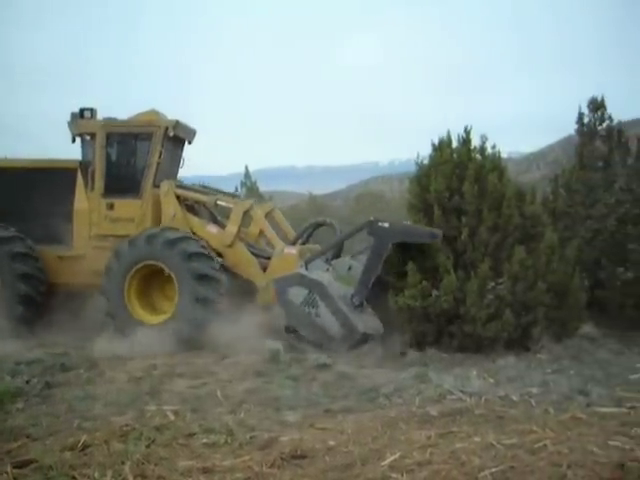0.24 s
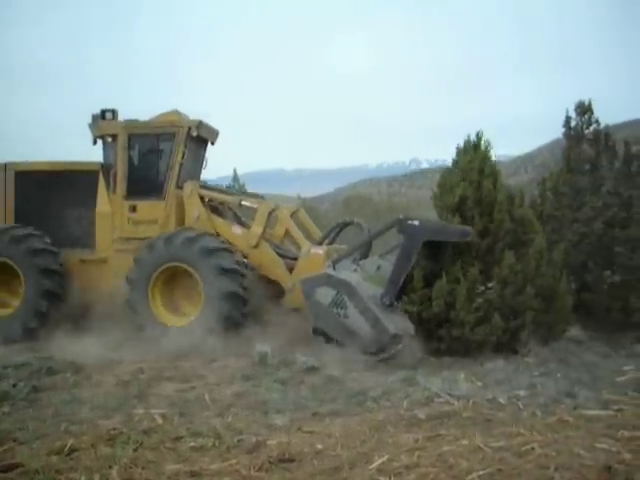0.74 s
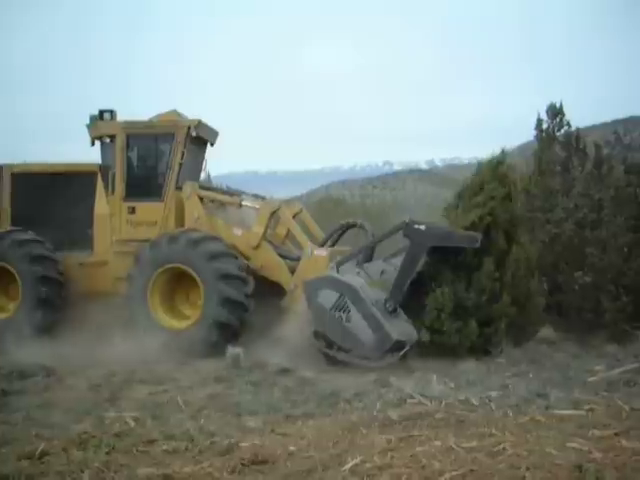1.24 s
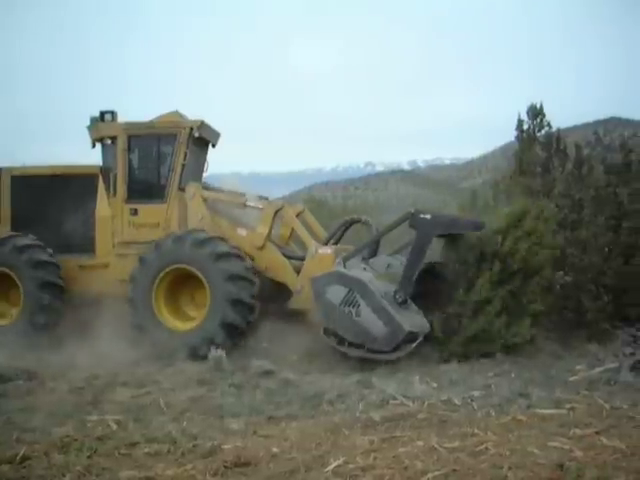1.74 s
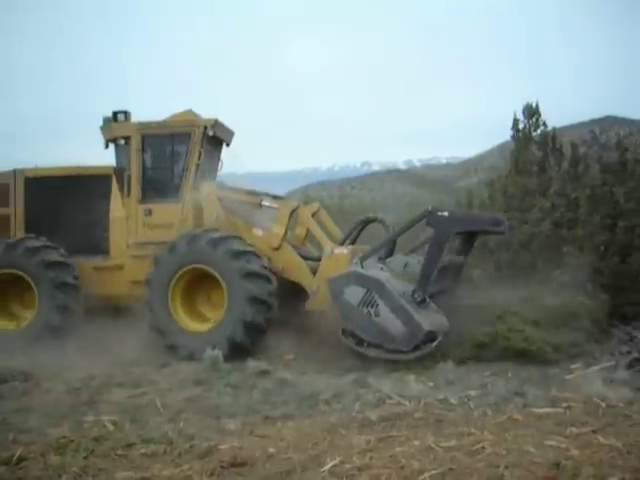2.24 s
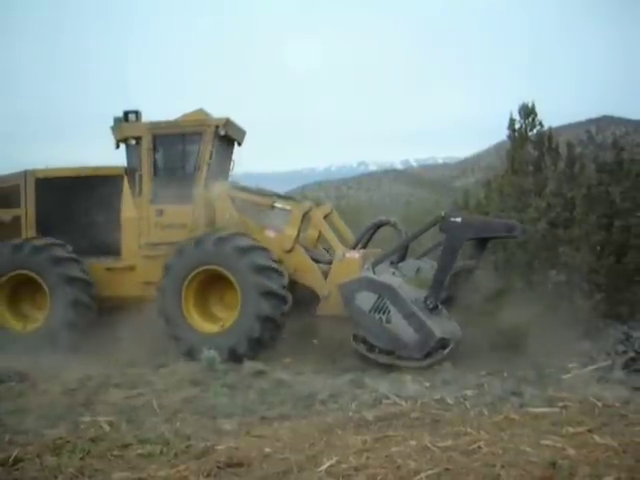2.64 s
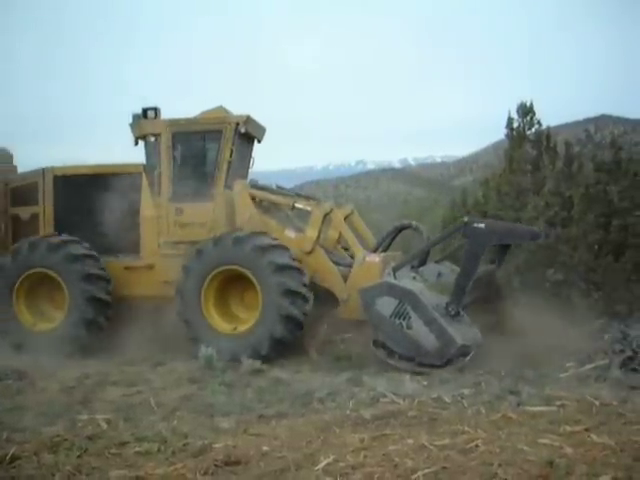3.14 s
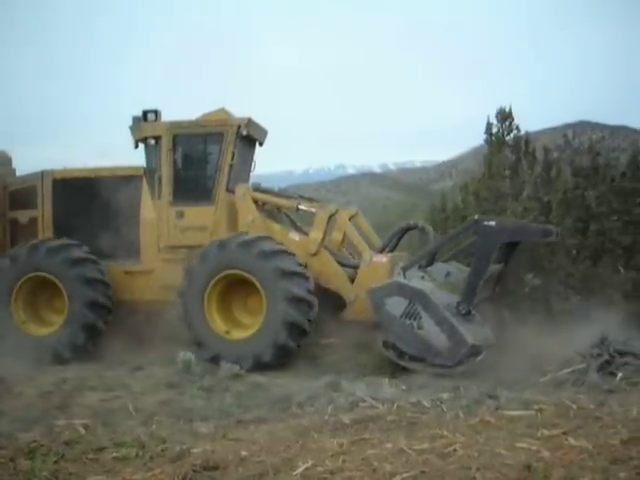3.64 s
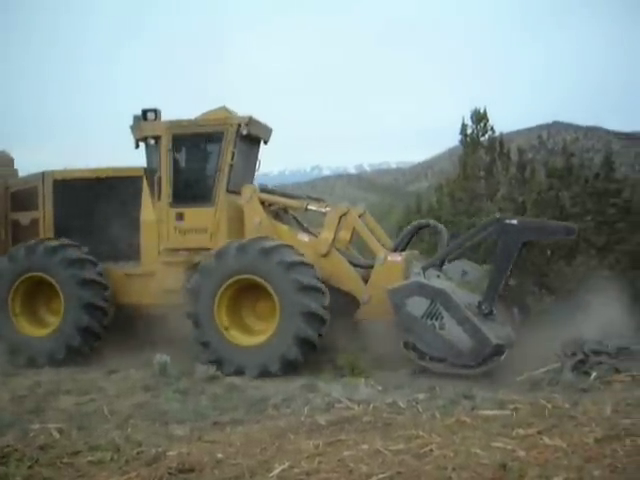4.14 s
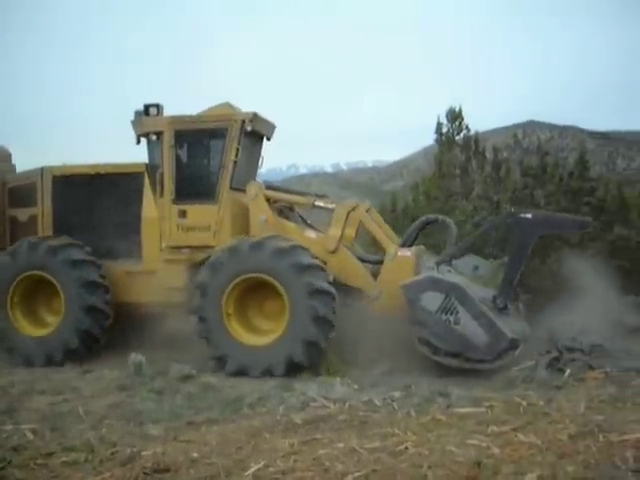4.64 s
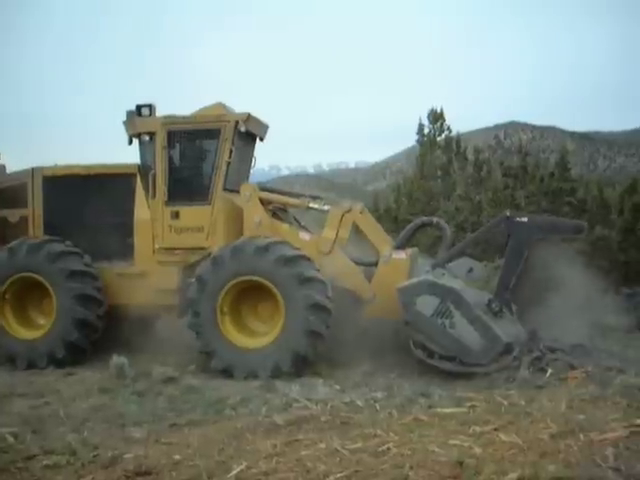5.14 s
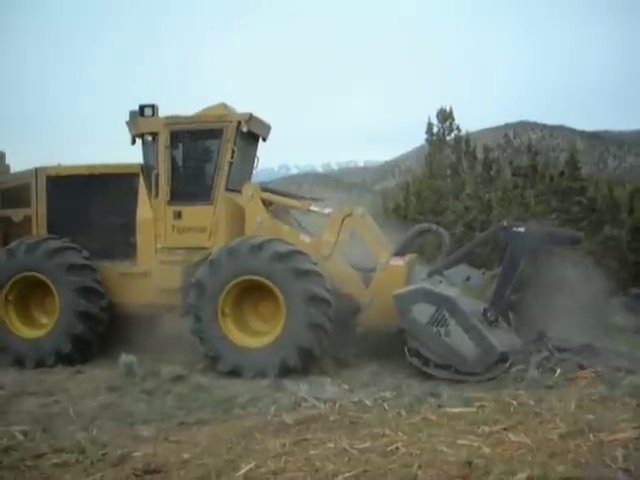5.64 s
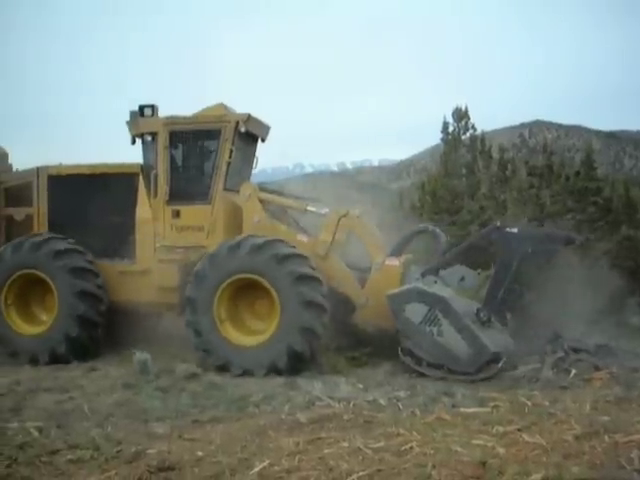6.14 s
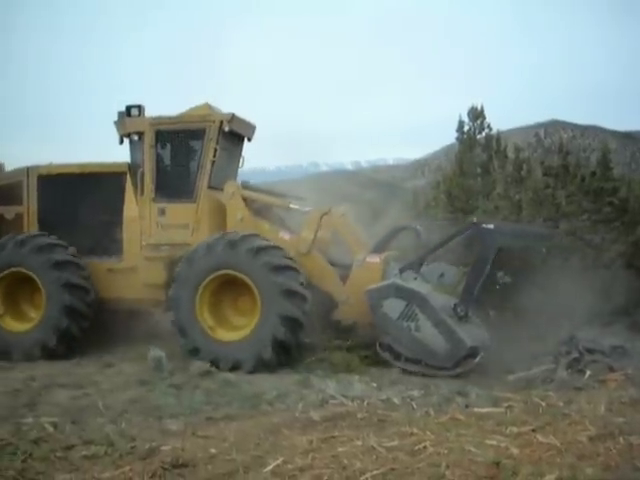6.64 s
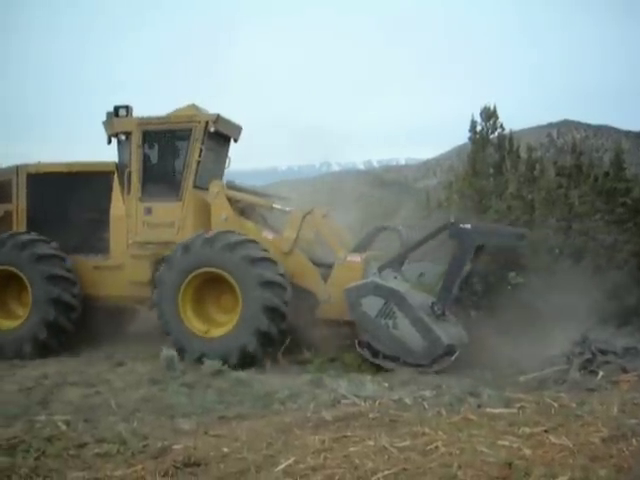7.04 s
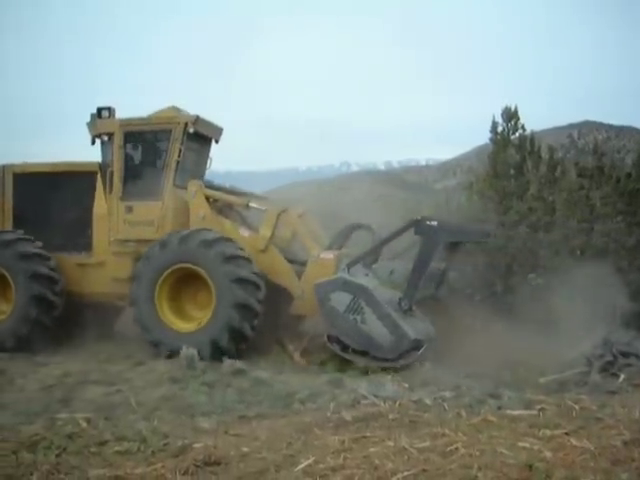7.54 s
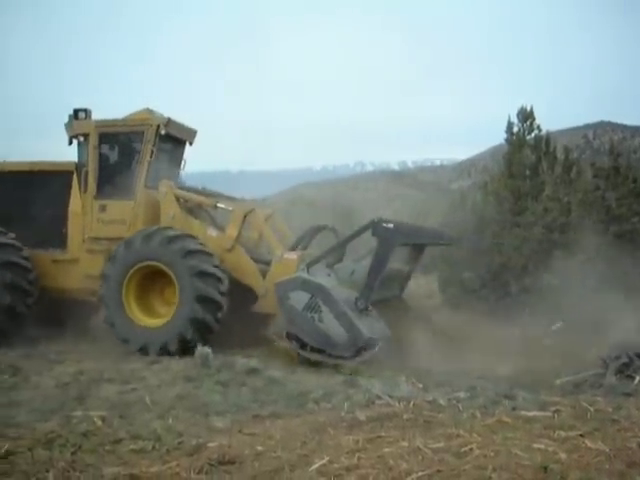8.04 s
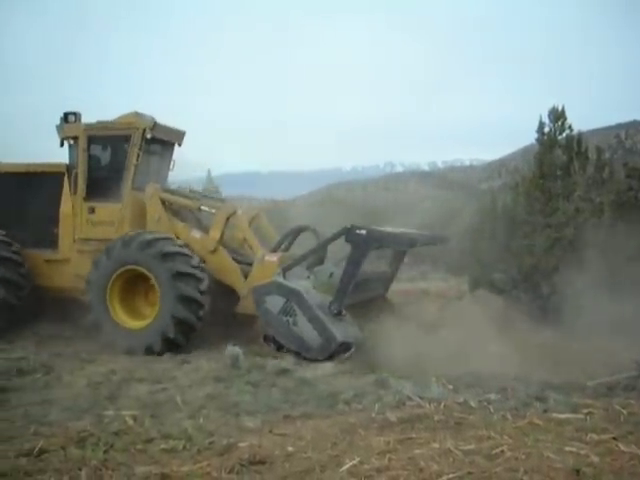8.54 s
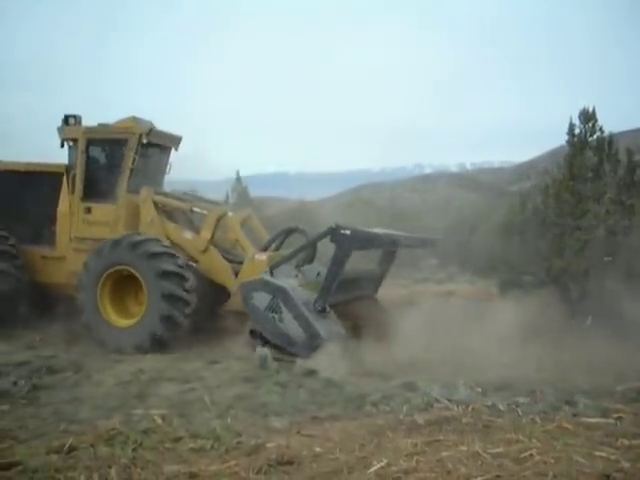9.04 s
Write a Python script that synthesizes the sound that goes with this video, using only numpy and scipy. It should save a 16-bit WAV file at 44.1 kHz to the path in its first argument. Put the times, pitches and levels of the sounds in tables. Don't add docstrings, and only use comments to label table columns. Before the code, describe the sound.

A wheeled mulching machine works in open air: steady diesel roar, clean humming engine and hydraulic tones, and a continuous gritty metallic grinding of wood. Rapid trunk cracks come first, sparser snaps follow, then a calmer middle with sliding hydraulic whistles and turbo whine, then renewed biting and snapping as it backs off. A log thuds on the hood at the end. Boxy, dull-topped microphone with small overload clicks.

```python
import sys
import numpy as np
from scipy import signal
from scipy.fft import rfft, irfft
from scipy.io import wavfile
from scipy.ndimage import uniform_filter1d

SR = 44100
rng = np.random.default_rng(int(sys.argv[2]) if len(sys.argv) > 2 else 0)


def file_out(sig):
    cols = np.atleast_2d(sig).T
    lim = np.clip(cols, -1, 1)
    pcm = np.round(lim * 32767).astype(np.int16)
    wavfile.write(sys.argv[1], SR, pcm)


def gain_from_decibels(decibels):
    exponent = np.asarray(decibels, float) / 20
    return 10 ** exponent


N = 409248
MEAN_CUT_DB = -22


def unit(x):
    return x / np.sqrt(np.mean(x ** 2))


def curves(table):
    s, *columns = np.transpose(table)
    return [np.interp(np.arange(N) / SR, s, c) for c in columns]


def ring(x, hz, width):
    return signal.lfilter(*signal.iirpeak(hz, hz / width, fs=SR), x)


def body(x, modes):
    total = 0
    for hz, width, db in modes:
        total = total + gain_from_decibels(db) * unit(ring(ring(x, hz, width), hz, width))
    return unit(total)


def walk(rate):
    k = int(SR / rate)
    held = np.repeat(rng.standard_normal(N // k + 1), k)
    return 0.64 * uniform_filter1d(uniform_filter1d(held, k), k)[:N]


def fade(x, decay_s):
    return signal.lfilter([1], [1, -np.exp(-1 / (decay_s * SR))], x)


def gate(s, length, slew_s=0.05):
    t = np.arange(N) / SR
    return np.clip(np.minimum(t - s, s + length - t) / slew_s, 0, 1)


# time in seconds, level in dB.
ROAR = [(0.08, -21.5), (0.15, -22.5), (0.26, -22), (0.38, -24.5), (1.02, -34), (1.63, -24.5), (2.77, -25.5),
        (2.9, -22.5), (3.13, -25), (4.45, -21), (4.98, -24), (5.0, -22), (7.24, -24), (7.75, -25),
        (8.41, -25), (8.61, -26), (8.97, -23.5), (9.2, -26)]
# frequency in Hz, density in dB per Hz.
ROAR_COLOUR = [(41, -45), (70, -25), (108, -15.5), (156, -11.5), (202, -8.5), (283, -1.5), (497, -7),
               (632, -1.5), (696, -2.5), (857, 0), (1320, -10.5), (1660, -5), (1910, -10.5), (2680, -5),
               (3250, -9), (4220, -39), (7150, -120)]


def roar(turns, puff=0.16, flicker_db=1.1, trim_db=-1.5):
    hz = np.fft.rfftfreq(N, 1 / SR)
    f, db = np.transpose(ROAR_COLOUR[:-2])
    gas = rng.standard_normal(N) * (1 + puff * np.cos(2 * np.pi * 3 * turns))
    spectrum = rfft(gas) * gain_from_decibels(np.interp(np.log(hz + 1), np.log(f), db))
    edges = [0, 200, 400, 800, 1600, SR]
    air = 0
    for lo, hi in zip(edges, edges[1:]):
        band = irfft(spectrum * ((hz >= lo) & (hz < hi)), N)
        air = air + band * gain_from_decibels(flicker_db * walk(12))
    low = np.sqrt(np.mean(irfft(spectrum * (hz > 230) * (hz < 560), N) ** 2))
    return air / low * gain_from_decibels(curves(ROAR)[0] + trim_db + 1.5 * walk(6))


# time in seconds, shaft speed in Hz, level in dB.
TURBO = [(0, 1740, -60), (3.6, 1755, -55), (4.1, 1782, -43), (4.4, 1783, -41), (4.6, 1790, -43),
         (4.75, 1822, -44), (4.9, 1805, -42), (5.1, 1795, -41), (5.35, 1780, -40), (5.6, 1784, -40),
         (6, 1775, -41), (6.4, 1762, -42), (6.9, 1751, -44), (7.2, 1742, -52), (9.28, 1735, -60)]


def turbo(second_db=6.5):
    hz, db = curves(TURBO)
    phase = 2 * np.pi * np.cumsum(hz * (1 + 0.00085 * walk(10))) / SR
    whine = np.sin(phase) + gain_from_decibels(second_db) * np.sin(2 * phase)
    return np.sqrt(2) * gain_from_decibels(db + 4.5 + 1.2 * walk(2.6)) * whine


# start in seconds, length in seconds, start and end pitch in Hz, level in dB.
WHISTLES = [
    (3.85, 0.39, 1765, 1775, -37.5),
    (4.152, 0.48, 1514, 1468, -30),
    (4.751, 1.15, 1789, 1768, -34),
    (7.754, .35, 188.2, 184, -33),
]


def whistles(waver_db=2.0):
    t, out = np.arange(N) / SR, 0
    for s, length, start_hz, end_hz, db in WHISTLES:
        hz = np.interp(t, [s, s + length], [start_hz, end_hz]) * (1 + .003 * walk(20))
        level = gate(s, length) * gain_from_decibels(db + waver_db * walk(11))
        out = out + level * np.sin(2 * np.pi * np.cumsum(hz) / SR)
    return np.sqrt(2) * out


# start in seconds, length in seconds, surge in dB.
VALVES = [
    (0.097, 0.27, 5),
    (2.803, 0.65, 6),
    (3.401, .6, 11),
    (3.95, 0.26, 7),
    (4.25, .45, 11),
    (5.974, 1.0, 11.5),
    (7.1, 1.5, 5),
]
# level in dB re the firing tone, dB per Hz of crank sag, dB per dB of cutting,
# share of a valve surge (0 to 1), change in dB while reversing.
VOICES = [(0, 1, -0.5, 0.01, -2), (4.5, -0.5, -0.33, 0., -10), (1.5, -2, -1.3, 0., -1.5),
          (-2.5, 4.5, -0.44, 0., 0), (2, 0.5, 0., 0.81, -1.5), (-3.5, -1, -1.7, .5, 1)]


def sung_levels(crank_hz, firing_db):
    surge = sum(db * gate(s, length) for s, length, db in VALVES)
    cut = curves(DRUM)[0] - MEAN_CUT_DB
    sag = 35.3 - crank_hz
    away = gate(7.45, 1.7, slew_s=.25)
    return [firing_db + db + per_hz * sag + per_cut * cut + share * surge + away_db * away
            for db, per_hz, per_cut, share, away_db in VOICES]


# time in seconds, crank speed in Hz, firing tone in dB.
ENGINE = [(0.0, 35.18, -39.5), (0.05, 34.98, -33.5), (0.23, 35.08, -30.5), (0.95, 35.6, -46),
          (1.89, 32.7, -37), (2.17, 33.93, -35.5), (2.56, 33.96, -39), (2.89, 32.6, -34.5),
          (3.33, 34.36, -36), (3.52, 33.97, -35), (4.01, 35.35, -34.5), (4.63, 35.53, -33.5),
          (4.81, 34.68, -37.5), (4.96, 35.9, -35.5), (5.4, 35.18, -33), (6.67, 34.78, -33.5),
          (8.53, 33.84, -32), (9.28, 34.88, -33)]
SUNG = [3, 6, 8, 9, 18, 27]
# multiple of the crank speed, level in dB re the firing tone.
FAINT = [(4, -22), (5, -17.5), (5.5, -27), (7, -8), (10, -11), (11, -6.5), (12, -32.5), (14, -9),
         (16, -3.5), (22, -8), (24, -17), (32, -10.5), (35, -17), (36, -11.5)]


def engine_tones(turns, levels_db, waver_db=.8, faint_waver_db=4.0, slip=.3):
    def tone(k, db, waver):
        level = np.sqrt(2) * gain_from_decibels(db + waver * walk(9))
        return level * np.sin(2 * np.pi * (k * turns + rng.random()) + slip * k / 12 * walk(14))
    sung = sum(tone(k, db, waver_db) for k, db in zip(SUNG, levels_db))
    return sung + sum(tone(k, levels_db[0] + db, faint_waver_db) for k, db in FAINT)


def thud(start_s=9.105, hz=680., db=-10.5, decay_s=.035):
    t = np.arange(N) / SR - start_s
    knock = unit(ring(rng.standard_normal(N), hz, 350.))
    return knock * (t > 0) * np.exp(-np.abs(t) / decay_s) * gain_from_decibels(db)


# start in seconds, peak in dB, pitch in Hz.
TRUNK = [(0.5668, -2.5, 1770), (0.6445, -15.5, 1680), (0.6895, -5, 1720), (0.7284, -9.5, 1680),
         (0.7516, -1.5, 1680), (0.824, -2.5, 1670), (0.8477, -10, 1590), (0.881, -3.5, 1670),
         (0.9071, -5, 1660), (0.9402, -4, 1590), (0.9856, -1.5, 2320), (1.0137, -5.5, 1670),
         (1.0521, -5, 2840), (1.1178, -2, 1640), (1.1824, -12.5, 1670), (1.2435, -5.5, 1620),
         (1.2677, -8, 1760), (1.293, -7.5, 1650)]
# start in seconds, peak in dB, pitch in Hz.
SNAPS = [(1.5583, -3.5, 1640), (1.9169, -3.5, 1640), (1.9382, -1.5, 2590), (2.0022, 1.5, 2520),
         (2.4832, -7.5, 1630), (2.5698, -18, 1710), (2.6592, -4.5, 2820), (2.694, -5, 1740),
         (3.0156, -6, 1760), (3.4918, -8, 1730), (7.2122, -4, 1700), (7.6085, -4.5, 1770),
         (7.6454, -3, 1710), (7.8308, -3.5, 1740), (7.9096, -6, 1680), (7.9338, -4.5, 1730),
         (7.9733, -12, 1700), (8.1812, -6.5, 1650), (8.4112, -2.5, 1700), (8.5105, -7, 1650),
         (8.8402, -9, 1750), (9.05, -8, 1650)]


def snaps(decay_s=0.003, width=690.0, crack_hz=2730.0, crack_db=-2.0, trim_db=-0.5):
    out, n = np.zeros(N + 2048), np.arange(2048)
    events = [(s, db + 2.0, hz) for s, db, hz in TRUNK] + SNAPS
    for s, db, hz in events:
        noise = rng.standard_normal(2048)
        splinter = (noise + np.sign(noise)) * np.exp(-n / (decay_s * SR))
        burst = ring(splinter, hz, width) + gain_from_decibels(crack_db) * ring(splinter, crack_hz, 1600.)
        out[int(s * SR) + n] += burst / np.abs(burst).max() * gain_from_decibels(db + trim_db)
    return out[:N]


# time in seconds, cutting level in dB, chip stream level in dB.
DRUM = [(0.08, -26, -25), (0.23, -22, -21.5), (1.02, -23, -23.5), (1.35, -20.5, -16.5), (1.63, -21, -25.5),
        (2.34, -20.5, -22.5), (3.61, -22.5, -24), (3.76, -25, -20), (6.45, -25.5, -19.5),
        (7.68, -19, -27.5), (7.9, -20.5, -17), (7.95, -18.5, -31.5), (8.0, -20.5, -22.5), (8.61, -19, -21),
        (8.89, -21.5, -27), (9.12, -19, -21), (9.15, -20, -31.5), (9.2, -20, -22)]
# frequency in Hz, width in Hz, level in dB.
BOOM = [(739, 200, -4), (875, 330, 3), (1067, 450, -1.5)]
# frequency in Hz, width in Hz, level in dB.
RING = [(1545, 190, -5), (1650, 140, 0), (1730, 130, -1.5)]
# frequency in Hz, width in Hz, level in dB.
RATTLE = [(2350, 600, -2.5), (2750, 800, 0), (3400, 1100, 0)]


def drum(bites_per_s=110., bite_s=0.0013, spread_db=3.5, surge_db=-1.0):
    cut_db, chips_db = curves(DRUM)
    cut, chips = cut_db - MEAN_CUT_DB, chips_db - MEAN_CUT_DB
    trunk = np.exp(-((np.arange(N) / SR - .93) / 0.22) ** 2)
    crackle = 0.33 + 0.13 * trunk
    starts = (rng.random(N) < bites_per_s / SR) * gain_from_decibels(spread_db * rng.uniform(0.62, 1, size=N))
    bites = unit(fade(starts, bite_s))
    stream = np.sqrt(1 - crackle + crackle * bites ** 2) * gain_from_decibels(surge_db * walk(7.4))

    boom = body(rng.standard_normal(N) * stream ** 1.3, BOOM)
    boom = boom * gain_from_decibels(chips_db - 1 - 3.0 + 3.2 * walk(15) + 2.3 * walk(4))
    hood = body(rng.standard_normal(N) * stream ** .5, RING)
    hood = hood * gain_from_decibels(MEAN_CUT_DB + 2.2 * cut - 1.5 + 0.62 * walk(24) + 2.2 * walk(5))
    teeth = body(rng.standard_normal(N) * stream, RATTLE)
    teeth = teeth * gain_from_decibels(-20 + 0.57 * chips + 0.24 * cut - 3.5 + 1.8 * walk(4.6))
    splinters = body(rng.standard_normal(N) * bites, [(4056, 990, 0)])
    splinters = splinters * gain_from_decibels(-26 + 1.1 * cut + 6.0 * trunk)
    return boom + hood + teeth + splinters


def scene():
    crank_hz, firing_db = curves(ENGINE)
    turns = np.cumsum(crank_hz) / SR
    tones = engine_tones(turns, sung_levels(crank_hz, firing_db))
    return (roar(turns) + turbo() + whistles() + tones + thud() + snaps() + drum())[None]


def top_cut(x):
    return signal.sosfilt(signal.butter(12, 15870, fs=SR, output="sos"), x)


# frequency in Hz, gain in dB.
INPUT = [(20, -11.5), (60, -7.5), (100, 0.5), (3250, 1), (3600, -6.5), (4000, -17.5), (4300, -28.5),
         (4400, -38), (4500, -42), (4580, -68), (4700, -120)]
# time in seconds, peak in
# dB.
OVERLOADS = [(0.0907, -55), (0.9847, -24.5), (1.937, -43), (1.9949, -52), (2.2593, -23), (2.372, -31.5),
             (2.459, -16.5), (2.6977, -33.5), (3.0182, -30.5), (3.6551, -35.5), (4.0606, -33),
             (4.343, -35.5), (4.703, -40), (5.213, -24), (5.2323, -23.5), (5.3018, -40), (5.477, -26),
             (5.6103, -43), (6.5509, -34), (6.836, -32.5), (6.924, -34.5), (7.164, -37.5), (7.3446, -37.5),
             (7.4428, -34), (7.5263, -30.5), (7.6166, -35), (8.1808, -45), (8.4228, -29.5), (8.5962, -39.5),
             (9.115, -35.5),
             (1.8774, -55),
    (1.9173, -46),
    (3.8087, -53),
    (5.036, -48),
    (5.1984, -46),
    (6.1256, -52.5),
    (7.9092, -41.5),
    (8.5602, -42.5),
]


def record(dry, excess_db=0.0, excess_slope=0.74, rail=.71, offset=-.0224, ceiling=.72, knee=.006):
    f, gain_db = np.transpose(INPUT)
    half = gain_from_decibels(np.interp(np.fft.rfftfreq(N, 1 / SR), f, gain_db) / 2)
    narrow = dry
    for stage in range(2):
        rounded = narrow / (1 + (narrow / rail) ** 4) ** .25
        narrow = irfft(rfft(rounded) * half, N)
    wave = narrow[0] + offset

    s, db = np.transpose(OVERLOADS)
    near = ((s + .0007) * SR).astype(int)[:, None] + np.arange(-20, 21)
    at = near[np.arange(len(s)), wave[near].argmax(axis=1)]
    t = np.arange(-60, 61) / SR
    strike = np.exp(-(t / .000215) ** 2 / 2) * np.cos(2 * np.pi * 1900. * t)
    target = ceiling + gain_from_decibels(excess_db + excess_slope * db) - gain_from_decibels(-39.5)
    lift, struck = np.zeros(N), wave
    for touch in range(4):
        lift[at] += target - struck[near].max(axis=1)
        struck = wave + np.convolve(lift, strike, "same")
    sheared = -knee * np.logaddexp(-struck / knee, -ceiling / knee)
    return top_cut(sheared[None])


dry = scene()
out = record(dry)
file_out(out)
```